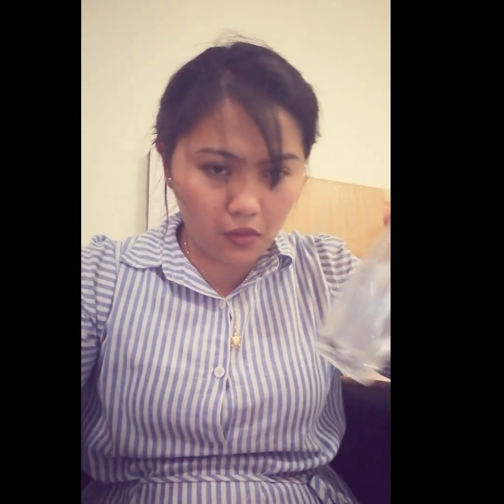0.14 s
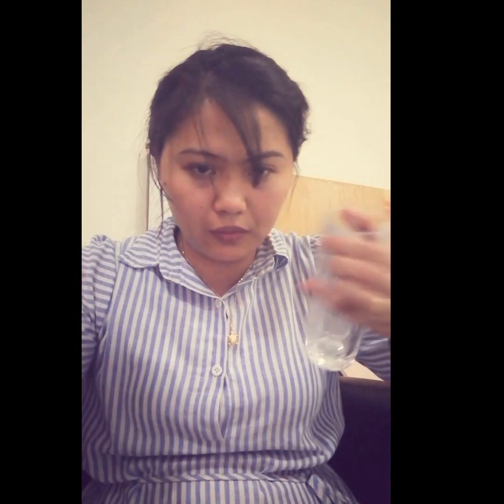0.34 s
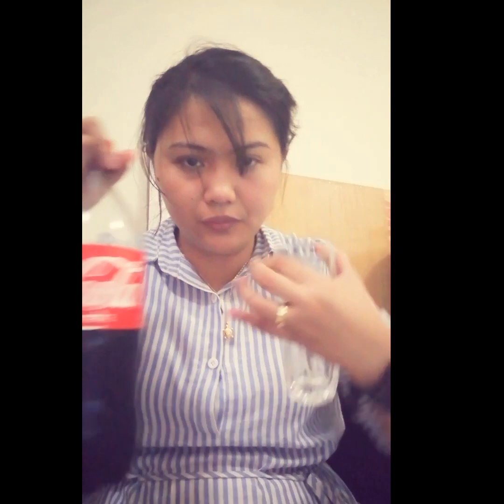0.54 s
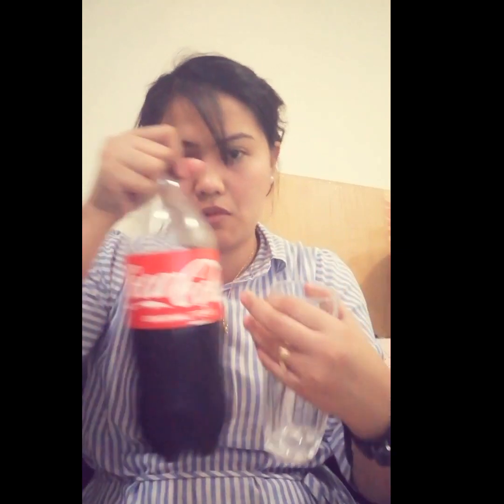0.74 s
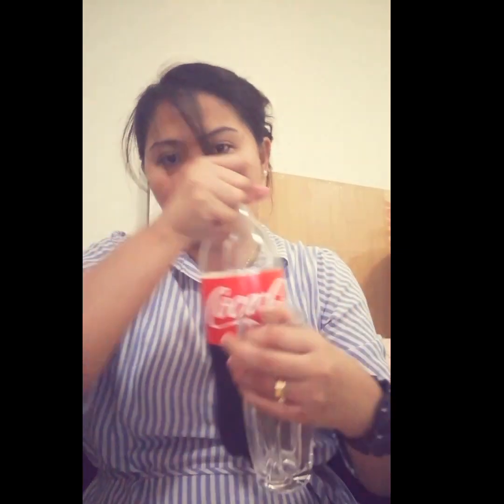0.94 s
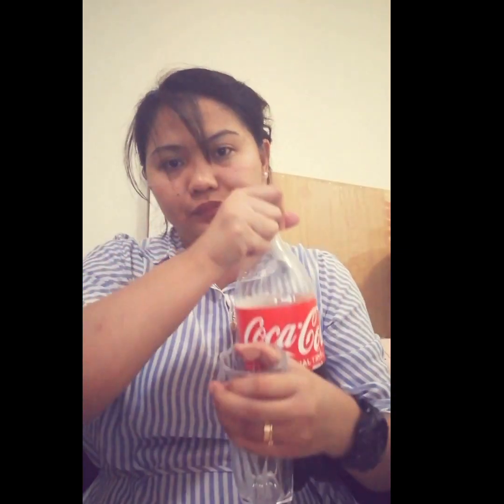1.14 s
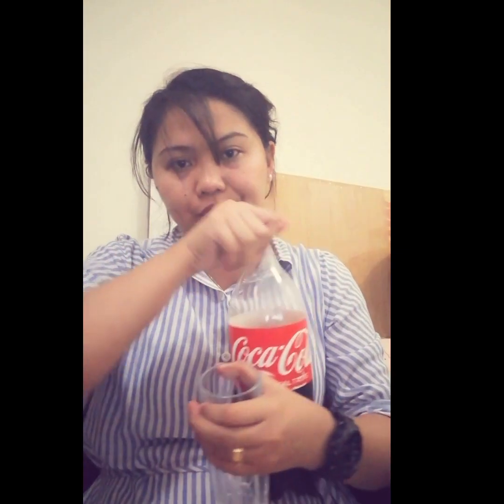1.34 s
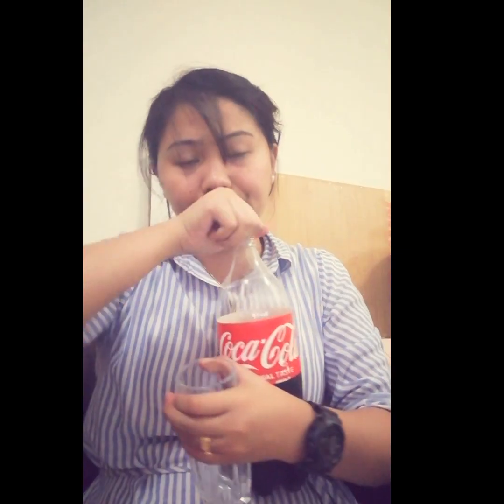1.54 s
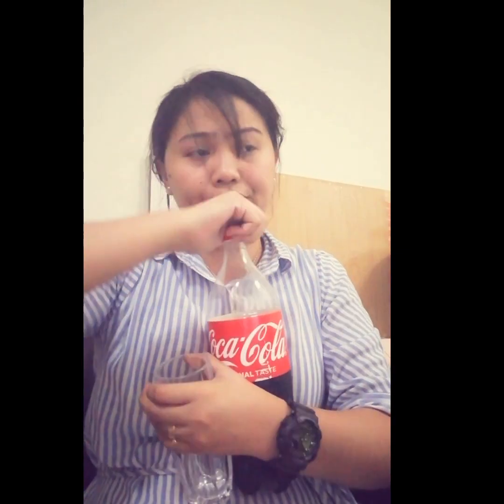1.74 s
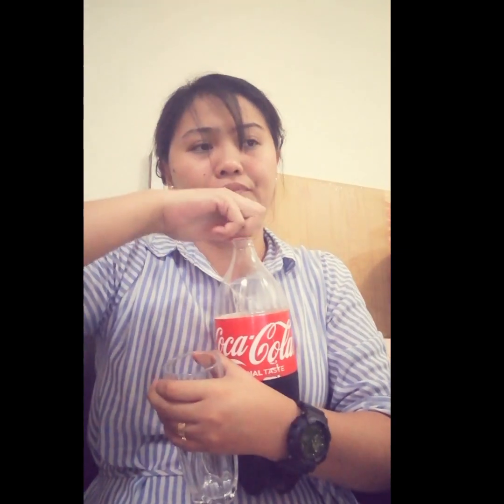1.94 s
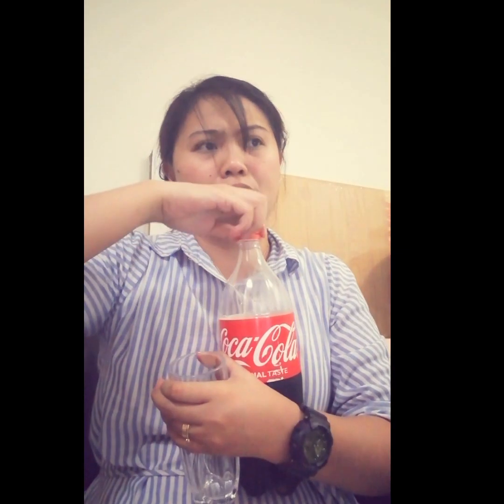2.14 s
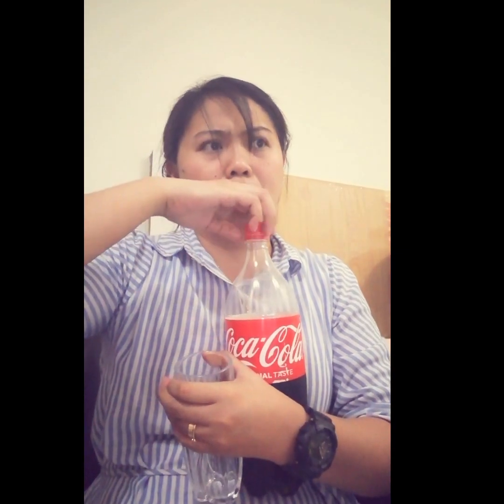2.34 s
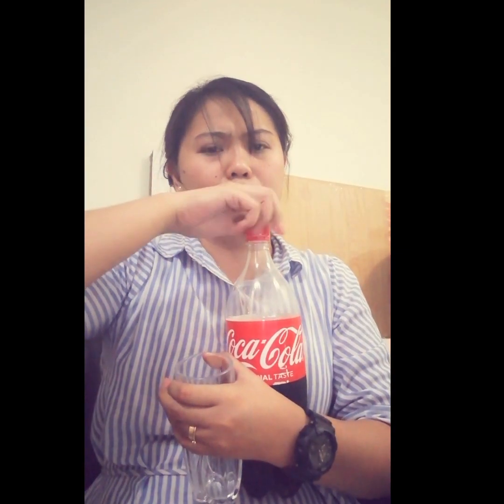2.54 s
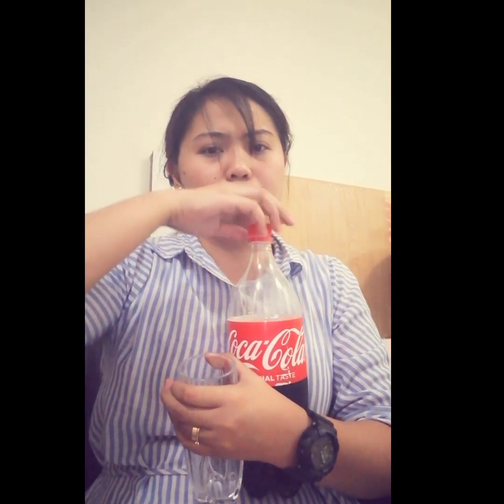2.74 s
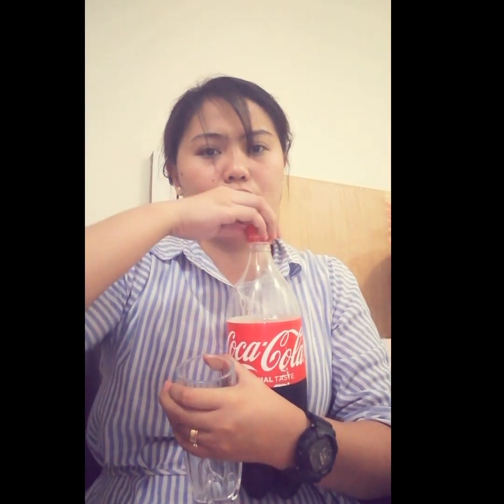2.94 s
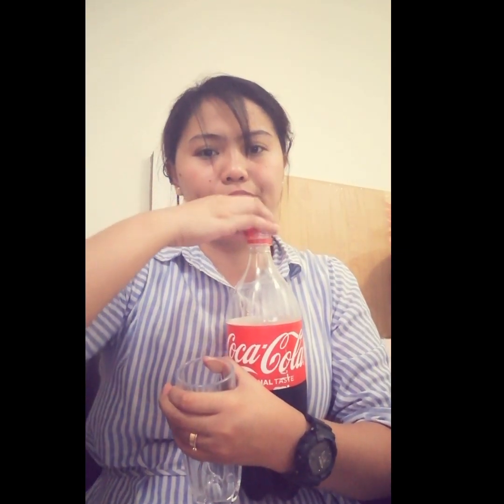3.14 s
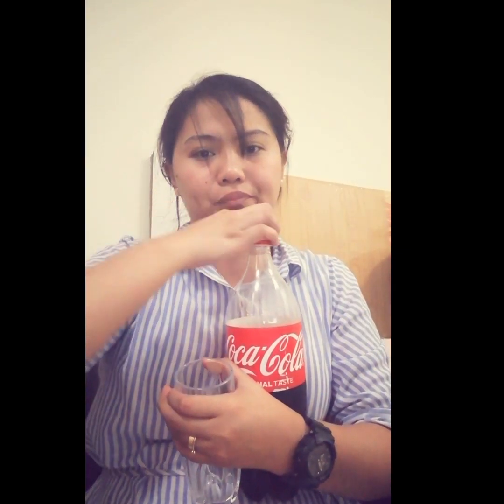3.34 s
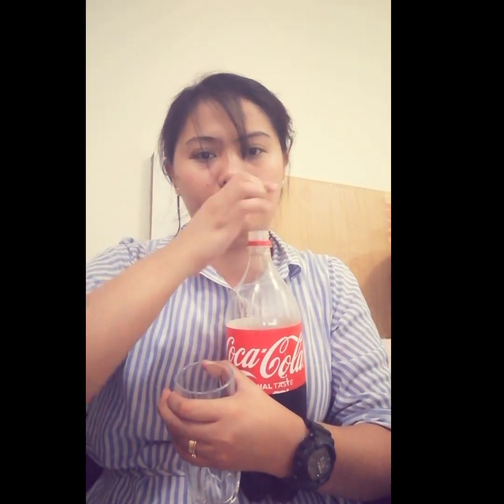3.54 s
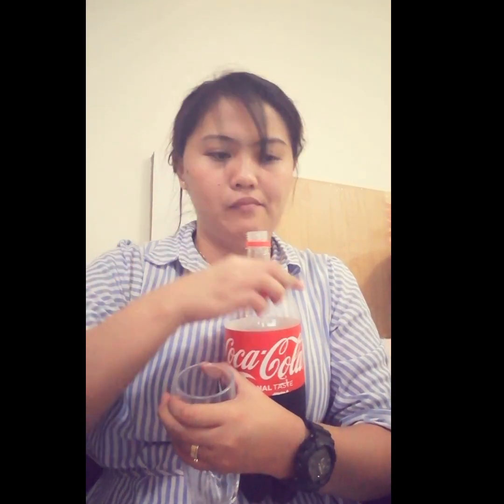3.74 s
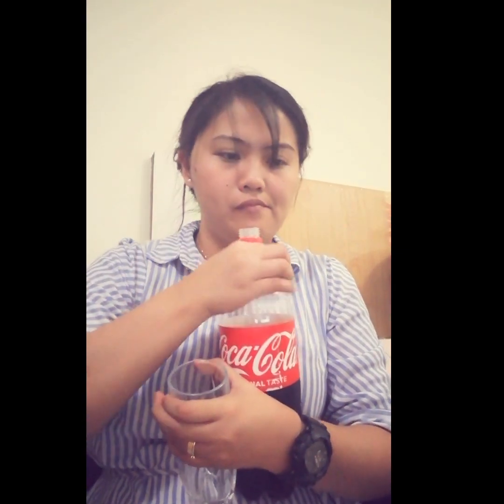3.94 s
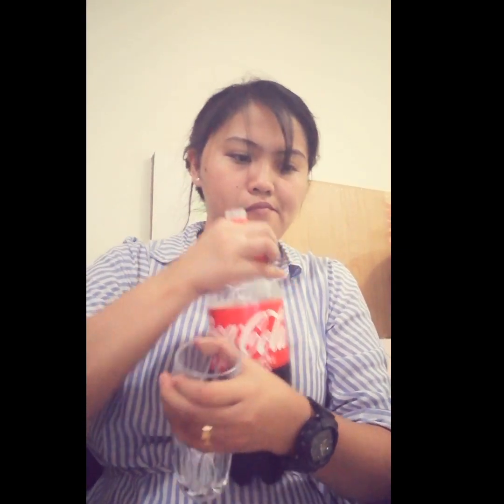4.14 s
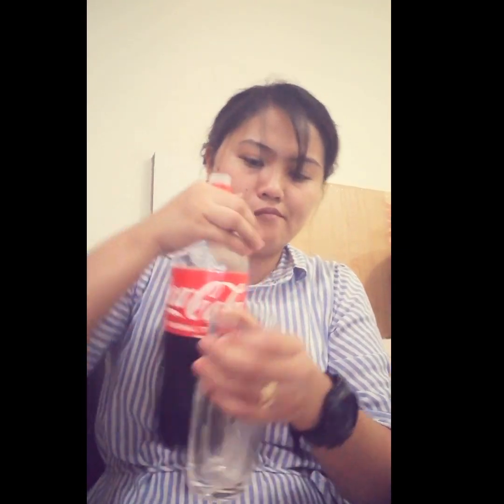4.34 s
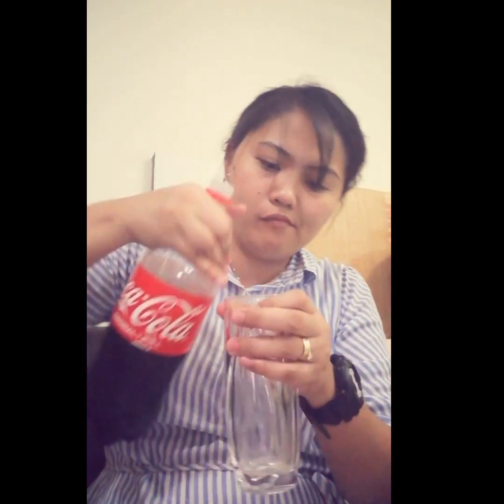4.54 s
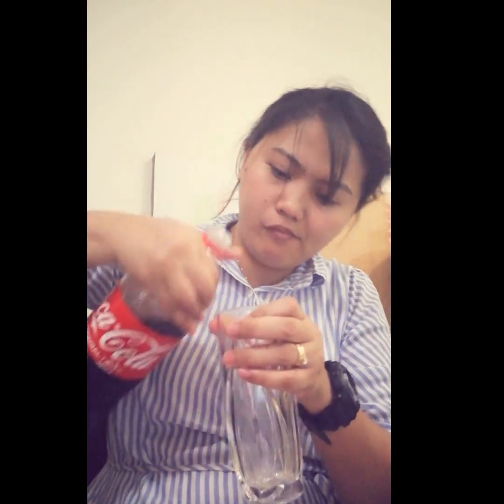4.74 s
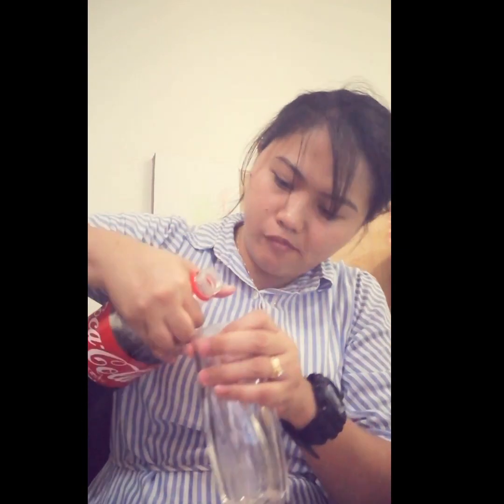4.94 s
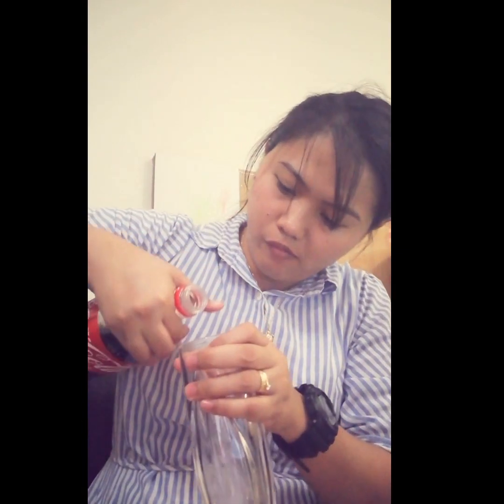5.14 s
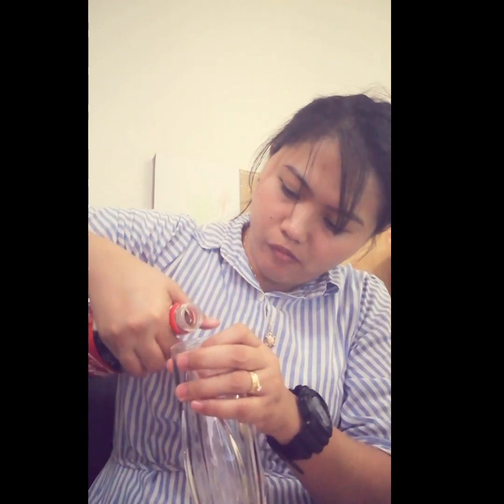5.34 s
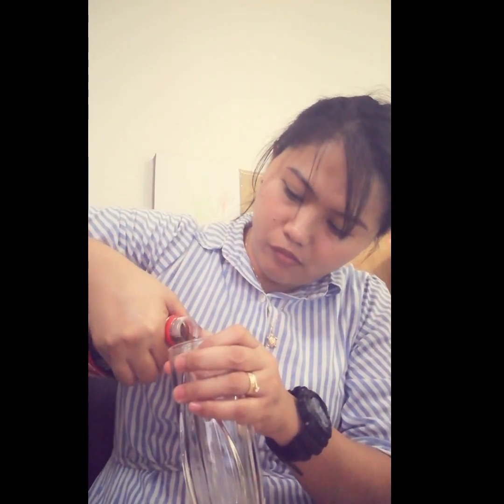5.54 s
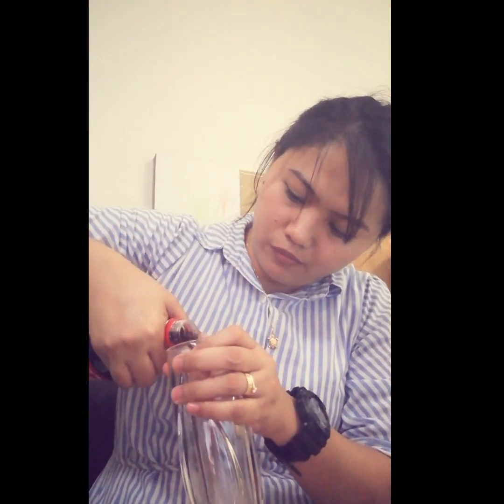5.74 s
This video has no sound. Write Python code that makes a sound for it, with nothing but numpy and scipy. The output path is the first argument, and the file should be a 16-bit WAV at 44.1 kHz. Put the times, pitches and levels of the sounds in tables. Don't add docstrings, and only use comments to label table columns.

```python
import sys
import numpy as np
from scipy import signal
from scipy.fft import rfft, irfft, next_fast_len
from scipy.io import wavfile
from scipy.ndimage import uniform_filter1d

SR = 44100
rng = np.random.default_rng(int(sys.argv[2]) if len(sys.argv) > 2 else 0)


def volts(x):
    e = np.asarray(x, float) / 20
    return 10 ** e


def to_wav(sig):
    pcm = np.clip(np.atleast_2d(sig), -1, 1) * 32767
    pcm = np.round(pcm).astype(np.int16)
    wavfile.write(sys.argv[1], SR, pcm.T)


N = 255339
T = np.arange(N) / SR


def evened(x):
    return x / np.sqrt(np.mean(x ** 2) + 1e-20)


def read(points, hz):
    f, value = np.transpose(points)
    return np.interp(np.log(hz + 1), np.log(f + 1), value)


def colour(x, points):
    size = next_fast_len(x.shape[-1])
    gain = volts(read(points, np.fft.rfftfreq(size, 1 / SR)))
    return irfft(rfft(x, size) * gain, size)[..., :x.shape[-1]]


def band(x, lo_hz, hi_hz):
    return signal.sosfilt(signal.butter(N=2, Wn=[lo_hz, hi_hz], btype="band", fs=SR, output="sos"), x)


def resonate(x, hz, width_hz):
    turn = np.exp(2j * np.pi * np.cumsum(hz * np.ones(len(x))) / SR)
    r = np.exp(-np.pi * width_hz / SR)
    return (turn * signal.lfilter([(1 - r) ** 2], [1, -2 * r, r ** 2], x / turn)).real


def lumps(width_s):
    size = max(round(width_s * SR), 2)
    return evened(uniform_filter1d(uniform_filter1d(rng.standard_normal(N), size), size))


def column(rows, index):
    rows = np.array(rows)
    return volts(np.interp(T, rows[:, 0], rows[:, index], left=-140, right=-140))


def add(mix, s, sound):
    part = mix[round(s * SR):][:len(sound)]
    part += sound[:len(part)]


def ring(hz, db, t60, t):
    return volts(db - 60 * t / t60) * np.sin(2 * np.pi * hz * t)


def pings(rows):
    out, t = np.zeros(N), np.arange(1500) / SR
    rise = 1 - np.exp(-t / 0.00014)
    for s, db, hz, t60 in rows:
        add(out, s, ring(hz, db, t60, t) * rise)
    return out


def clicks(rows, gain_db, upper_hz, spread, overtone_db, upper_base_db, upper_share):
    full_db = 5
    out, t = np.zeros(N), np.arange(2600) / SR
    noise = rng.standard_normal((len(rows), 3, len(t)))
    scatters = np.exp(0.04 * noise[:, 0, 0])
    rise = 1 - np.exp(-t / 0.00065)
    for (s, db, body_hz, snap_db), (a, b, c), scatter in zip(rows, noise, scatters):
        t60 = 0.02 * volts(-0.5368 * (db + 28.0))
        upper_db = upper_base_db + upper_share * min(snap_db, full_db)
        upper_db -= max(snap_db - full_db, 0)
        body = ring(body_hz, -0.62, 0.5 * t60, t) + ring(1.58 * body_hz, overtone_db, 0.27 * t60, t)
        body += volts(-4.5 - 60 * t / t60) * evened(band(a, body_hz / spread, body_hz * spread))
        upper = ring(upper_hz * scatter, upper_db + 4.5, 0.5 * t60, t)
        upper += volts(upper_db - 4.5 - 75 * t / t60) * evened(band(b, 2050, 4850))
        top_hz = np.clip(6500 * np.exp(0.15 * snap_db), 5200, 11000)
        snap = volts(snap_db - 4.0 - 130 * t / t60) * evened(band(c, 3580, top_hz))
        crack = volts(1.22 * snap_db - 4.0) * (1 - t / 0.0001) * np.exp(-t / 0.0001)
        add(out, s, volts(db + gain_db) * (rise * (body + upper + snap) + crack))
    return out


def hum():
    # (frequency [Hz], level [dB per Hz])
    hum_tone = [(150, -9), (265, -3), (400, -11), (630, -16), (830, -8.5), (1500, -12.5), (1800, -15.5),
                (1950, -20.5), (2450, -25.5), (5270, -33), (8300, -34.5), (9000, -26), (10400, -27),
                (12600, -42.5), (14900, -35.5), (15400, -34), (15600, -61)]
    # (frequency [Hz], likeness [-1 to 1])
    likeness = [(60, 1), (130, 1), (290, 0.89), (640, -0.46), (1410, -0.16), (3100, 0.072), (6820, -0.029),
                (15000, -0.17)]
    # (frequency [Hz], difference [dB])
    side = [(60, -5), (110, -5), (200, 0), (380, -1.5), (700, -4), (1290, -7.5), (2380, -7), (4400, -1),
            (8120, -6), (15000, -9)]
    frames, hz = N // 256 + 5, np.fft.rfftfreq(1024, 1 / SR)
    a, b, c, d, patches = rng.standard_normal((frames, 513, 5)).T
    patches = evened(uniform_filter1d(uniform_filter1d(patches, size=10, axis=0), size=12, axis=1))
    same = np.clip(read(likeness, hz), -1, 1)[:, None]
    right = a + 1j * b
    left = same * right + np.sqrt(1 - same ** 2) * (c + 1j * d)
    tilt = volts(read(side, hz)[:, None] / 2)
    z = np.array([left * tilt, right / tilt]) * volts(read(hum_tone, hz)[:, None] + 1.35 * patches)
    return volts(-50.5) * evened(signal.istft(z, nperseg=1024, noverlap=768)[1][:, :N])


def breeze():
    # (time [s], strength [dB])
    strength = [(0.0, -44.5), (0.11, -43.5), (0.4, -46.5), (0.61, -38), (0.87, -45.5), (1.08, -42),
                (1.32, -47), (1.63, -53), (2.21, -51), (2.4, -52.5), (3.47, -45), (3.82, -44), (4.0, -32.5),
                (4.45, -48), (4.98, -47), (5.22, -40.5), (5.45, -46.5), (5.79, -37.5)]
    # (frequency [Hz], level [dB per Hz])
    eddy_tone = [(8.8, -33.5), (15, 0.5), (54, 1.5), (70, 4.5), (191, -9.5), (434, -40), (469, -26),
                 (506, -22), (600, -57.5), (780, -56), (1320, -120)]
    # (time [s], peak [dB], width [ms])
    thump_events = [(0.468, -32, 6.7), (0.482, -30, 3.4), (0.696, -26, 3.3), (0.734, -32, 3.1),
                    (1.071, -35.5, 2.1), (1.128, -36, 5.6), (1.139, -37, 3.9), (3.33, -31, 9.2),
                    (3.361, -30, 4.5), (3.863, -24.5, 2.55), (3.905, -26.5, 3.2), (3.967, -25, 3.7),
                    (3.981, -33, 5.7), (3.996, -37, 3.3), (4.007, -23.5, 2.7), (4.033, -37, 4.4),
                    (4.049, -31, 2.8), (4.083, -35, 5.4), (4.13, -31, 6.6), (4.16, -24, 4.7),
                    (4.215, -32, 5.1), (4.301, -30.5, 2), (4.474, -28, 3), (4.489, -28, 2.3),
                    (5.04, -32.5, 4), (5.145, -30, 2.5), (5.19, -37, 5.6), (5.35, -32, 3.3),
                    (5.384, -30.5, 2.2), (5.706, -32.5, 9.3), (5.723, -26, 2.8), (5.763, -35, 6.1)]
    # (time [s], peak [dB], width [ms])
    pull_events = [
        (1.076, -35.5, 2.9),
        (1.134, -28.5, 2.5),
        (1.183, -36, 2),
        (3.338, -32, 3.6),
        (4.482, -29.5, 2.7),
    ]
    eddy, odd = (evened(colour(rng.standard_normal(N), eddy_tone) * volts(3.75 * lumps(0.028)))
                 for _ in range(2))
    thumps = np.zeros(N)
    for (s, db, width_ms), sign in [(row, 1) for row in thump_events] + [(row, -1) for row in pull_events]:
        u = np.arange(-2, 7, 1000 / width_ms / SR)
        push = 1.22 * np.exp(-2.8 * u ** 2) - 0.6 * np.exp(-0.8 * (u - 1.3) ** 2)
        add(thumps, s - 2 * width_ms / 1000, sign * volts(db) * push)
    odd = colour(odd, [(30, -17), (70, -12), (150, -5), (600, -3)])
    return thumps + column(strength, index=1) * volts(-1.0) * (eddy + odd * np.array([[1], [-1]]))


def rubs():
    # (start [s], length [s], pressure [dB], brightness [dB])
    strokes = [(0.194, 0.12, -74, -64.5), (0.424, 0.18, -73, -55.5), (1.09, 0.25, -60, -51),
               (1.337, 0.18, -69, -56.5), (1.543, 0.24, -71, -66), (2.305, 0.12, -60, -59),
               (2.625, 0.24, -52, -59), (2.904, 0.17, -52.5, -51.5), (3.133, 0.26, -58.5, -57.5),
               (3.384, 0.25, -64, -76), (3.771, 0.16, -70, -63), (4.017, 0.38, -77, -62),
               (4.42, 0.13, -77, -54.5), (4.57, 0.23, -68, -74)]
    # (frequency [Hz], level [dB])
    plastic = [(450, -32), (750, 13), (1300, -12.5), (2100, 5), (2700, -10), (3350, 2), (4300, -8.5),
               (5200, -8), (6000, -42)]
    slips = volts(5.4 * np.minimum(rng.exponential(1, N), 4))
    slips = slips * (rng.random(N) < 600 / SR) * rng.choice([-1., 1.], N)
    drive = (evened(slips) + rng.standard_normal(N)) * volts(2.5 * lumps(0.008))
    shapes = [column([(s, -6.5), (s + 0.51 * length, 0), (s + length, -17)], index=1)
              for s, length, _, _ in strokes]
    pressure, bright = uniform_filter1d(volts(np.array(strokes)[:, 2:].T) @ shapes, size=600)
    body = evened(colour(drive, plastic)) * pressure
    fine = evened(colour(drive, [(4500, -10.5), (6600, 3.5), (8500, -2.0), (11000, -1.0), (13500, -5.5)]))
    return volts(10.5) * body + volts(0.5) * fine * bright


def wall_crackle():
    # (time [s], peak [dB], body pitch [Hz], brightness [dB])
    grip = [(0.8494, -47, 1480, -1), (1.1274, -52, 1290, -2), (1.138, -58, 1290, -6),
            (1.155, -48, 1250, -14), (1.186, -58, 1370, 9), (1.226, -58, 1380, 6), (1.1463, -47, 1450, 3),
            (1.1594, -45.5, 1250, 13), (1.2047, -44, 1440, 4), (1.2394, -42, 1250, -5),
            (1.2874, -46, 1340, -12), (1.3423, -49, 1490, -25), (1.3838, -49, 1354, 1.5),
            (1.5753, -51, 1320, 8)]
    # (time [s], peak [dB], body pitch [Hz], brightness [dB])
    lift = [(3.807, -47, 1230, 1.5), (3.858, -57, 1236, 1), (3.955, -62, 960, 11), (4.037, -48, 1480, -28),
            (4.049, -20, 1160, -16), (4.058, -49.5, 1500, 10.5), (4.067, -39, 1200, -5),
            (4.086, -23, 1270, -10.5), (4.13, -26, 1000, -12.5), (4.166, -33, 1270, -16),
            (4.243, -29, 1200, -18), (4.431, -63, 1240, 8), (4.4337, -32.5, 1240, 18.5),
            (4.568, -34, 960, -9), (4.5742, -43.5, 1093, 13.5), (4.5775, -24.5, 1000, 0),
            (4.602, -26.5, 1020, -0.5), (4.666, -32, 1100, -12), (4.692, -27, 1080, -14.5),
            (4.77, -33, 990, -16), (4.822, -30.5, 1050, -24), (4.912, -29, 1010, -25)]
    # (time [s], peak [dB], pitch [Hz], t60 [s])
    patches = [(4.051, -39, 1310, 0.016), (4.058, -38, 12100, .008), (4.069, -38, 1400, .012),
               (4.088, -35, 1290, .015), (4.131, -34, 1270, .014), (4.167, -30, 1360, 0.019),
               (4.167, -52, 6500, .005), (4.228, -48, 7000, .008), (4.244, -38, 1150, .012),
               (4.4338, -46, 1260, 0.01), (4.434, -23, 6660, .008), (4.434, -28, 4800, 0.0055),
               (4.5773, -33, 3180, .025), (4.602, -40, 3000, 0.016), (4.578, -40, 1050, .012),
               (4.6865, -42.5, 8750, .008), (4.693, -44, 1100, .012), (4.724, -37, 1200, .015),
               (4.771, -33, 1000, .012), (4.913, -40, 1000, .012)]
    out = pings(patches) + clicks(grip, 1.5, 3610, 2.0, 10.0, -5.5, 0.73)
    return out + clicks(lift, 1.7, 3190, 1.13, -16, -5.5, 0.81)


def knock():
    # (time [s], peak [dB])
    hits = [
        (1.069, -32),
        (1.0785, -25.5),
        (1.0885, -48),
        (1.0942, -42),
        (1.105, -44),
    ]
    # (frequency [Hz], level [dB], t60 [s])
    modes = [(1050, -3, 0.02), (1520, 2.5, 0.017), (1900, -4, 0.015), (2500, 5.5, 0.0086),
             (3000, -4, 0.0095), (3500, -1, .01), (4360, -12, .008)]
    out = pings([(s, db + mode_db, hz, t60) for s, db in hits for hz, mode_db, t60 in modes])
    return band(out, 400, 5200)


def clink():
    # (time [s], peak [dB])
    touches = [
        (0.7993, -13),
    ]
    # (frequency [Hz], level [dB], t60 [s])
    modes = [(1630, -11.5, 0.11), (3670, 0, 0.49), (6490, -0.5, 0.25), (9080, -3.5, .15), (9480, -17, .2),
             (10900, -4, 0.11), (12100, 0, .15), (12200, 2, .05)]
    out, t = np.zeros(N), np.arange(SR // 2) / SR
    damp = volts(-60 * (t / 0.011) ** 2) + volts(-26)
    rattle = rng.standard_normal((2, len(t)))
    tone = np.zeros(len(t))
    for hz, db, t60 in modes:
        tone += ring(hz, db - 0.00028 * hz, 0.45 * t60, t)
        tone += volts(db - 3.0 - 60 * t / t60) * evened(resonate(rattle[0], hz, 0.05 * hz))
    tick_tone = [(2000, -22), (4000, -4), (8000, -4), (9000, 0), (12500, 0), (13000, -40)]
    tick = evened(colour(rattle[1], tick_tone))
    for s, db in touches:
        hit = (tone + volts(-4.0 - 140 * t) * tick) * damp
        add(out, s, volts(db - 7.5) * hit * np.minimum(t / 0.00075, 1))
    return out


def cap_clicks():
    # (time [s], peak [dB], body pitch [Hz], brightness [dB])
    tight = [(2.324, -49.5, 1520, -20), (2.335, -46, 1270, -28), (2.3795, -34, 1160, -23),
             (2.387, -34, 1250, -20), (2.4042, -16, 1460, -32), (2.4655, -33, 1540, -23),
             (2.561, -77, 1400, 14), (2.61, -56, 1460, 8), (2.621, -56, 1150, 5), (2.628, -14.5, 1150, -24),
             (2.6308, -22.5, 1550, 2), (2.6345, -29, 1500, -29), (2.641, -41, 1900, -18),
             (2.647, -37, 2040, -17), (2.663, -42, 1520, -22), (2.668, -39, 1800, -24),
             (2.712, -41, 1240, -34), (2.723, -41, 1300, -6), (2.733, -33.5, 805, -9),
             (2.737, -32, 1900, -20), (2.742, -24, 1280, -28), (2.746, -37, 820, -32),
             (2.752, -28, 2050, -33), (2.759, -53, 905, -31), (2.783, -40, 1900, -34),
             (2.788, -34, 1390, -38), (2.799, -31, 960, -24), (2.888, -42, 1430, -27),
             (2.896, -52, 1285, -44), (2.9135, -40, 1520, 2.5), (2.916, -18.5, 980, -29),
             (2.922, -16, 1350, -23), (2.9262, -24, 1090, -39), (2.933, -37, 1900, -33),
             (2.984, -31.5, 1200, -28), (3.019, -34, 1220, -45)]
    # (time [s], peak [dB], body pitch [Hz], brightness [dB])
    loose = [(3.13, -38, 1360, -11), (3.138, -35, 1310, -24), (3.166, -29, 1380, -8.5),
             (3.2138, -40.5, 1330, 12), (3.219, -8.5, 1440, -17.5), (3.235, -18, 1450, -12),
             (3.405, -39, 1260, -39), (3.429, -34, 1260, -36), (3.445, -35, 1460, -13),
             (3.462, -43, 1290, -17), (3.487, -44, 2100, 2), (3.493, -37, 1330, 1),
             (3.503, -42, 2190, -1.5)]
    # (time [s], peak [dB], pitch [Hz], t60 [s])
    patches = [(2.4657, -30, 3590, 0.014), (2.470, -29.5, 3360, 0.013), (2.613, -42, 3930, .012),
               (2.6215, -42, 5000, .008), (2.631, -15, 5240, .006), (2.6465, -24, 3900, .01),
               (2.734, -34, 5030, .008), (2.7995, -28, 4900, .007), (2.916, -27, 3250, 0.011),
               (2.933, -28, 1980, 0.017), (2.975, -33, 3520, 0.014), (2.984, -37, 3500, .012),
               (3.2145, -38, 2400, .006), (3.2195, -18, 2450, 0.007), (3.2195, -23.5, 1050, 0.011),
               (3.2195, -27, 8500, .005), (3.236, -33, 2300, .01), (3.497, -41, 3420, .012),
               (3.504, -38, 3370, .012)]
    out = pings(patches) + clicks(tight, 5.8, 3390, 1.37, 0.66, 3.7, 0.51)
    return out + clicks(loose, 0.87, 3410, 1.86, 1.6, 3.0, 0.82)


def jet():
    # (time [s], level [dB])
    flow_rows = [
        (1.69, -74),
        (1.714, -24.5),
        (1.732, -21.5),
        (1.92, -13.5),
        (2.04, -16),
        (2.12, -17.5),
        (2.19, -30),
        (2.28, -57),
        (2.33, -79.5),
    ]
    # (frequency [Hz], level [dB per Hz])
    hiss_tone = [(2650, -81), (4500, -34), (6560, -9), (8070, -9.5), (8830, -1), (10200, -3.5), (12300, -4),
                 (14900, 3.5), (15600, -7.5), (15800, -36)]
    # (time [s], pitch [Hz], level [dB])
    neck = [
        (1.69, 2670, -13),
        (1.77, 2050, 2),
        (1.82, 1610, 3),
        (1.9, 1280, 1.5),
        (1.95, 1480, -7),
        (1.98, 2000, -2.5),
        (2.33, 2100, -3),
    ]
    # (time [s], peak [dB], pitch [Hz])
    spits = [(1.879, -15, 1480), (1.887, -18, 1490), (1.916, -19, 1000), (1.921, -22, 2870),
             (1.925, -4, 1540), (1.937, -2.5, 2340), (1.9392, -19, 1900), (1.9405, -9, 890),
             (1.947, -22, 1070), (1.968, -17, 1200)]
    # (time [s], peak [dB], pitch [Hz])
    gulps = [(1.88, -28.5, 200), (1.886, -34.5, 200), (1.893, -29, 260), (1.906, -32, 250),
             (1.923, -24.5, 200), (1.938, -26, 303), (1.947, -51, 250), (1.957, -30, 300),
             (1.961, -39.5, 249), (1.967, -39, 200)]
    flow = column(flow_rows, index=1)
    flutter = volts(0.89 * lumps(0.0021) + 0.89 * lumps(0.0005)) * 1.07 ** lumps(0.0082)
    surge = volts(4 * np.exp(-((T - 2.08) / 0.026) ** 2))
    hiss, stray = evened(colour(rng.standard_normal((2, N)), hiss_tone))

    roar_db = np.minimum(np.maximum(-5.5 - 31.5 * (T - 1.776), -14), 0)
    roar_tone = [(1800, -38.5), (2500, -20.5), (3000, -13.5), (3650, -8.0), (4300, -8), (5500, -5.0), (7000, -14.0)]
    roar = evened(colour(rng.standard_normal(N), roar_tone)) * volts(roar_db)

    when, neck_hz, neck_db = np.transpose(neck)
    sputter_db = -24.5 + np.interp(T, when, neck_db) + 12.5 * np.exp(-((T - 1.93) / 0.018) ** 2)
    low = resonate(rng.standard_normal(N) * volts(2.5 * lumps(0.0035)), np.interp(T, when, neck_hz), 1720)
    sputter = evened(band(low, 800, 6000)) * volts(sputter_db)

    peak_s = 1.775
    whistle_db = -14.5 - 56 * np.maximum(T - peak_s, 0) - 88 * np.clip(peak_s - T, 0, 1)
    whistle = evened(resonate(rng.standard_normal(N), 3730, 370)) * volts(whistle_db)
    lip_db = -22 - 152.5 * np.maximum(T - flow_rows[1][0], 0)
    lip = evened(resonate(rng.standard_normal(N), 2860, 474)) * volts(lip_db)
    throat_db = -6.5 - 53 * np.maximum(T - 1.89, 0)
    throat = evened(resonate(rng.standard_normal(N), 6840, 2060)) * volts(throat_db)

    out = volts(5.0) * flow * flutter * (whistle + lip + throat + surge * hiss + roar + sputter)
    out += pings([(s, db, hz, 0.004) for s, db, hz in spits])
    out += pings([(s, db + 3, hz, 0.025) for s, db, hz in gulps])
    return out, volts(2) * flow * flutter * surge * stray


def room(x):
    # (frequency [Hz], t60 [s])
    walls = [(300, 0.48), (1000, 0.34), (4000, 0.23), (12000, 0.18)]
    taps = np.zeros((2, SR // 2))
    at = np.arange(160, SR // 2 - 20, 20)
    at = at + rng.integers(0, 20, (2, len(at)))
    np.put_along_axis(taps, at, rng.choice([-1., 1.], at.shape), 1)
    hz, t, z = signal.stft(taps, SR, nperseg=256)
    fade = volts(-60 * t / np.maximum(read(walls, hz), 0.03)[:, None])
    tail = signal.istft(z * fade, SR, nperseg=256)[1]
    return signal.fftconvolve(x[None], tail / np.linalg.norm(tail[0]), axes=1)[:, :N]


def scene():
    # (frequency [Hz], level [dB])
    ports = [(600, 0.5), (5000, 0), (8000, 2), (10200, 4), (12800, -8.5), (15600, -8.5), (15900, -23),
             (16500, -32)]
    # (frequency [Hz], level [dB])
    shadow = [(200, -1), (700, -16.5), (1300, -9.5), (2400, -9), (4400, -7), (6800, -10.5), (9000, -5.5),
              (10600, 0.5), (12500, 2), (15000, -11)]
    cap = cap_clicks()
    (gas, stray), glass = jet(), clink()
    low = gas + glass + knock() + wall_crackle() + rubs()
    to_walls = cap + low - (1 - volts(-1.5)) * glass - (1 - volts(-0.5)) * gas
    wet = room(colour(to_walls, ports))
    late = np.roll(cap, 2) + np.roll(low, 27)
    direct = colour(late, [(800, -1.0), (3000, -3.5), (12000, -20.5)])
    left = colour(colour(direct + stray, ports) + volts(-4.5) * wet[0], shadow)
    right = colour(cap + low, ports) + volts(-9.5) * wet[1]
    return np.array([left, right]) + breeze() + hum()


def roll_off(x):
    return signal.sosfilt(signal.butter(12, 15850, fs=SR, output="sos"), x)


def record(dry):
    power_db = 10 * np.log10(abs(uniform_filter1d((dry ** 2).mean(0), size=4000)) + 1e-12)
    fall = T * 110.0
    over_db = np.maximum(np.maximum.accumulate(power_db + fall) - fall + 27.5, 0)
    keep = np.exp(-1 / (0.082 * SR))
    ducked = dry / volts(0.41 * signal.lfilter([1 - keep], [1, -keep], over_db))
    ceiling = 1.1
    mix = colour(ceiling * np.tanh(ducked / ceiling), [(15650, 1.5), (15900, -25.0), (16300, -66.5)])
    return roll_off(mix)


dry = scene()
out = record(dry)
to_wav(out)
```